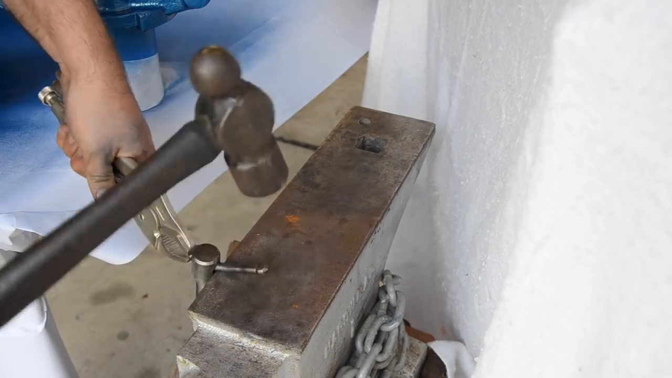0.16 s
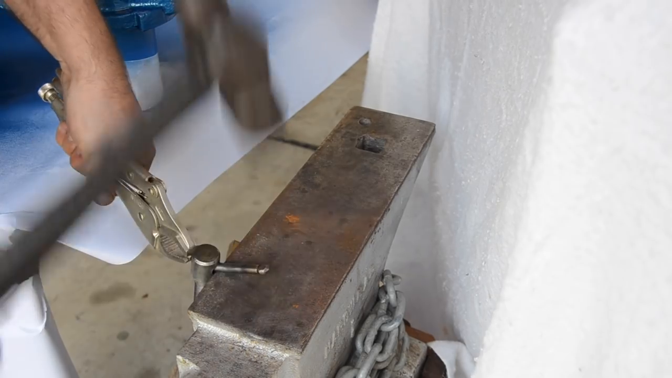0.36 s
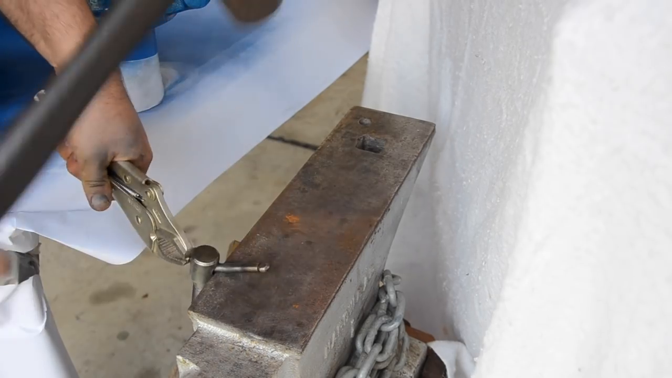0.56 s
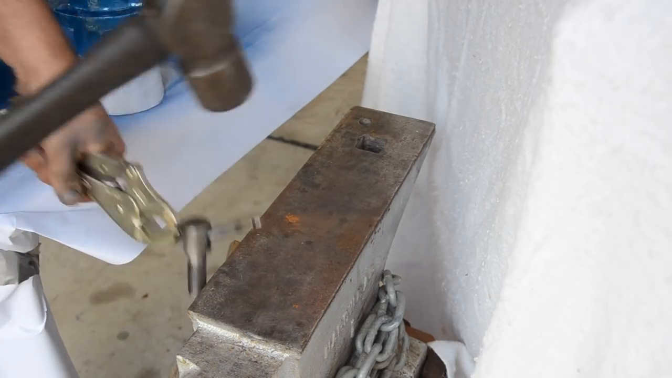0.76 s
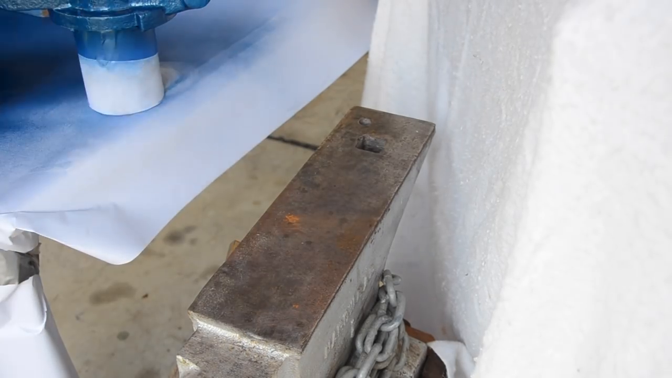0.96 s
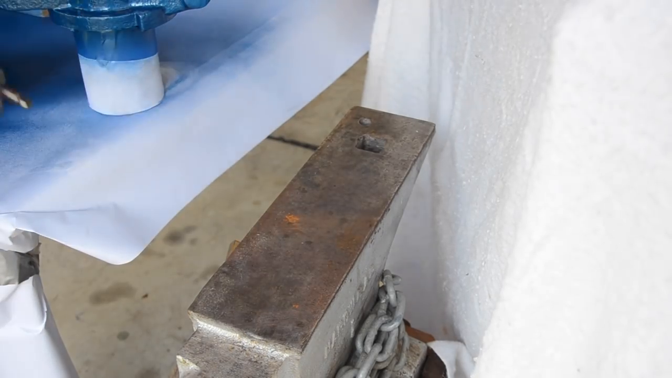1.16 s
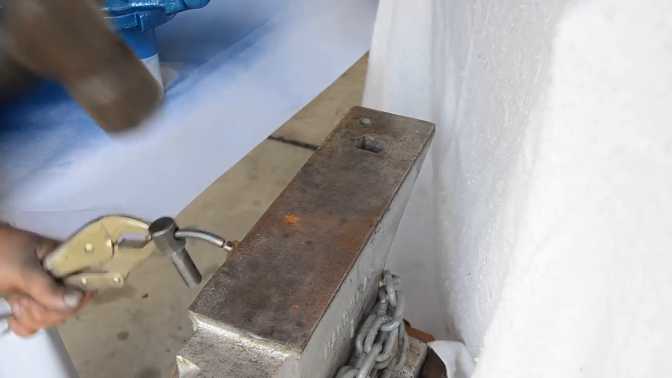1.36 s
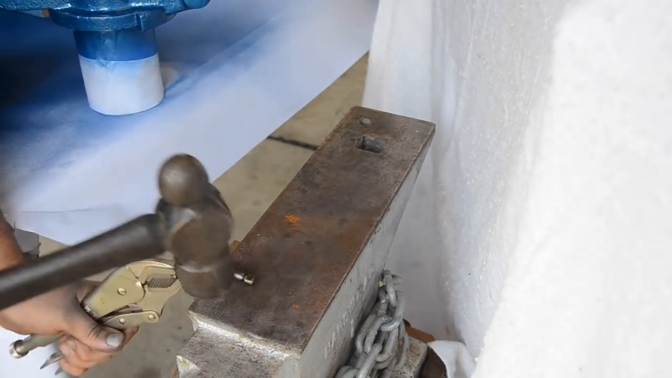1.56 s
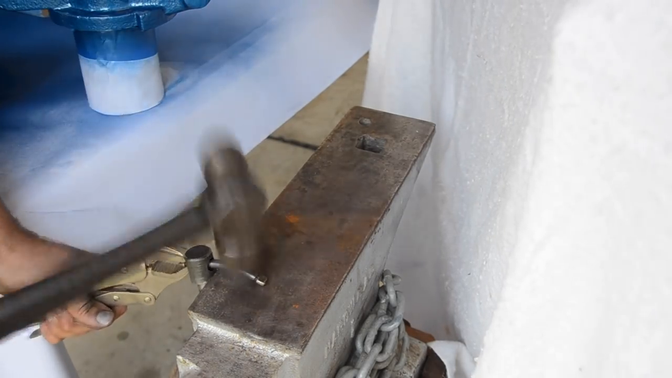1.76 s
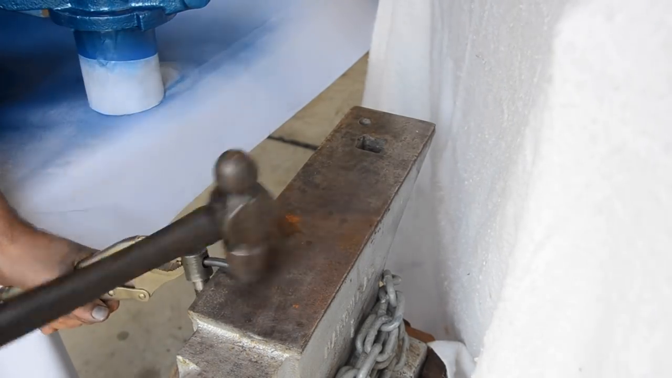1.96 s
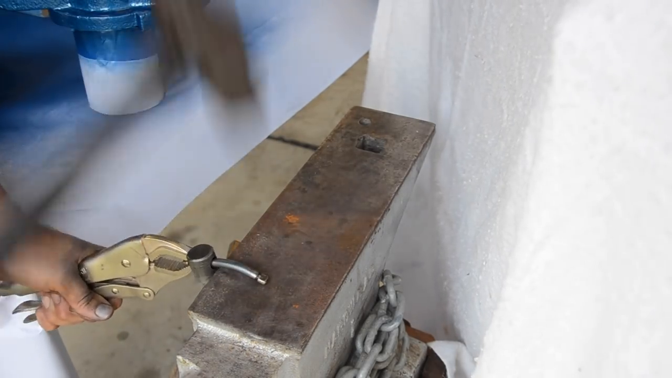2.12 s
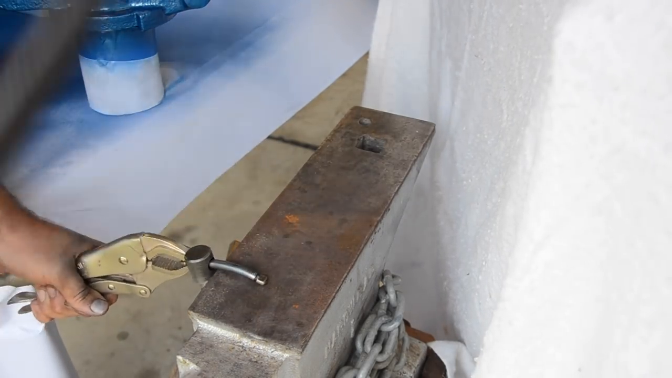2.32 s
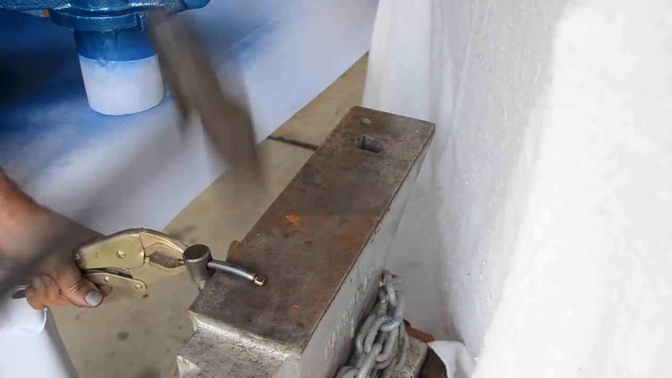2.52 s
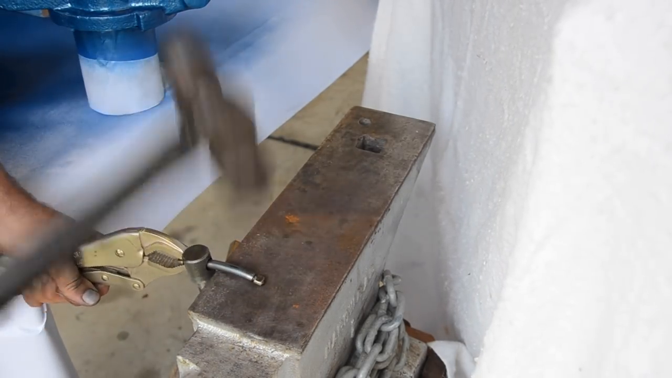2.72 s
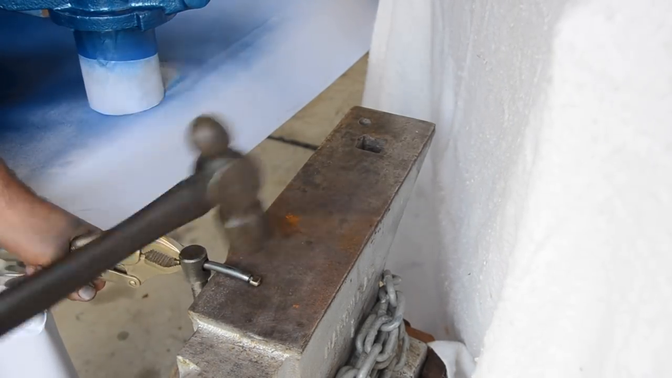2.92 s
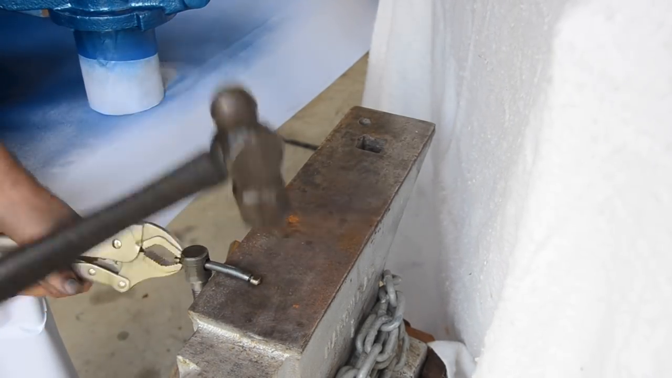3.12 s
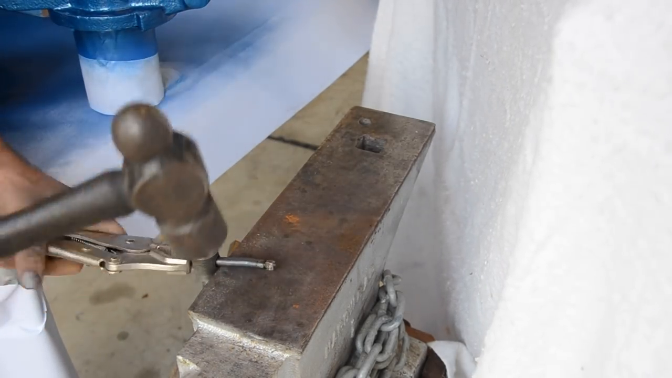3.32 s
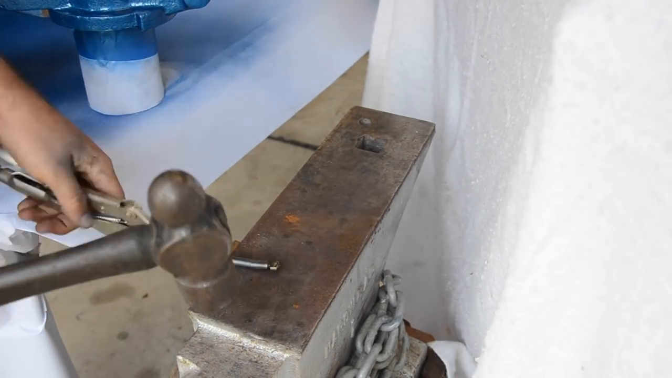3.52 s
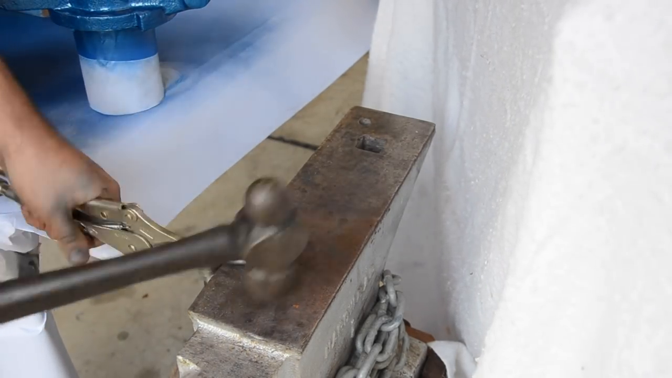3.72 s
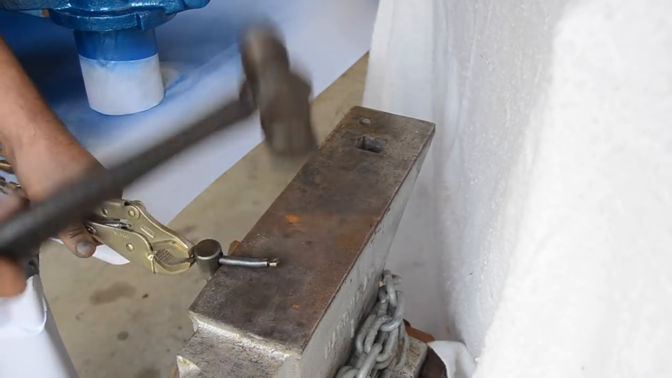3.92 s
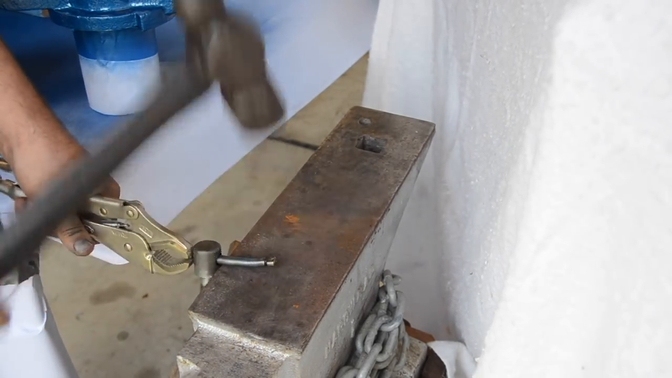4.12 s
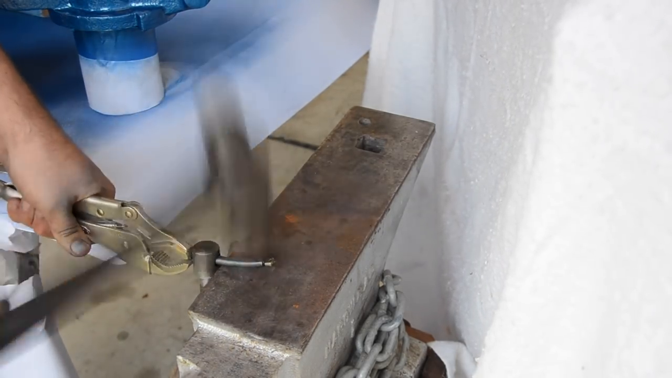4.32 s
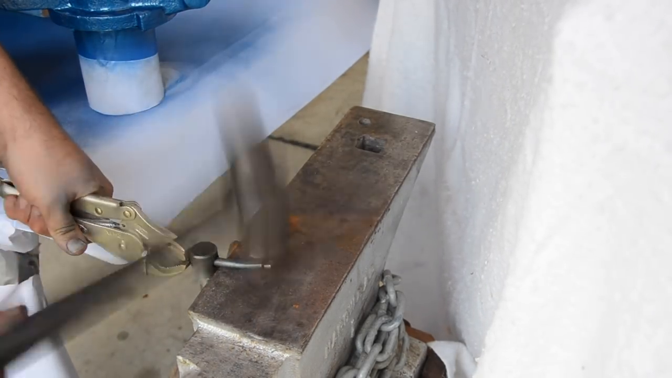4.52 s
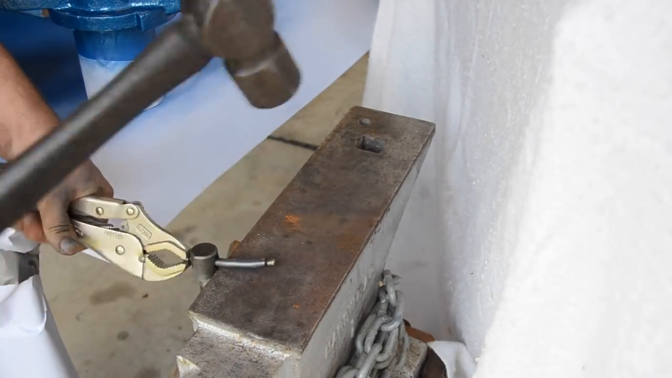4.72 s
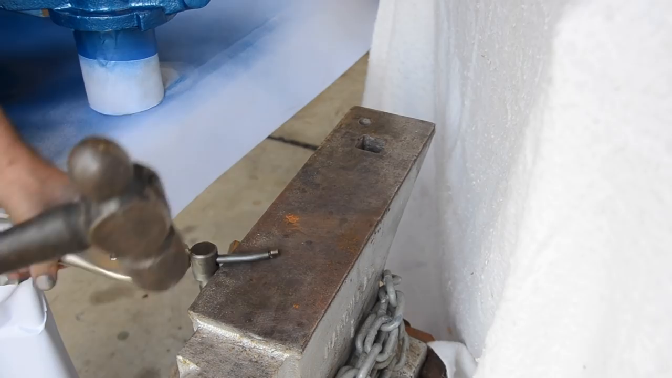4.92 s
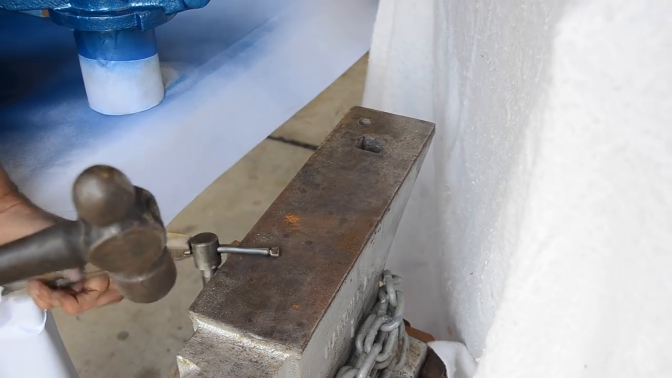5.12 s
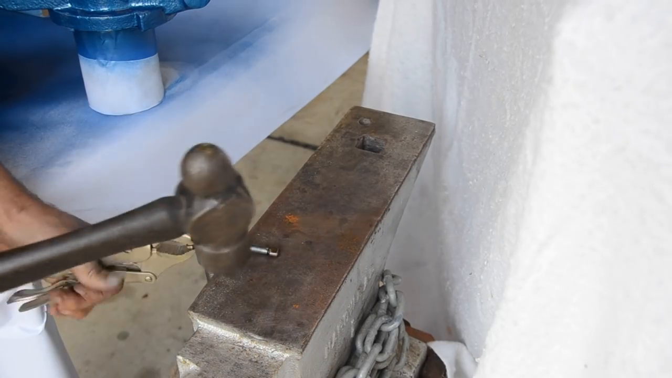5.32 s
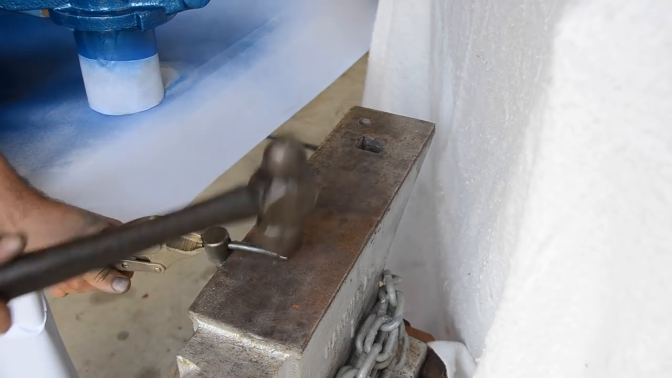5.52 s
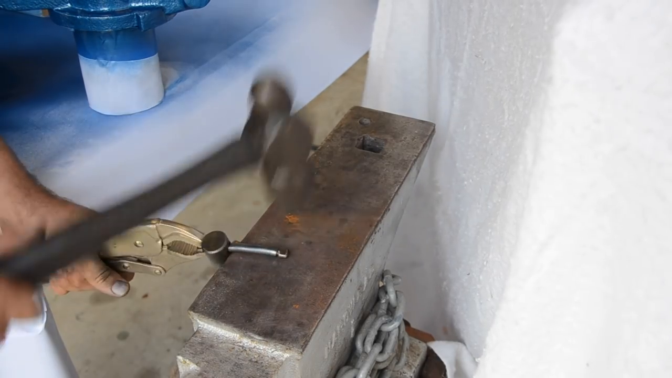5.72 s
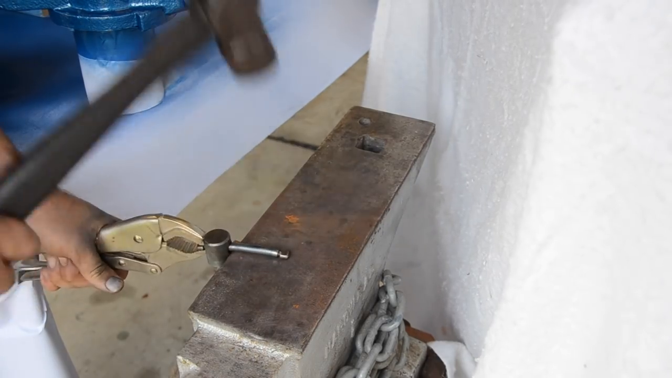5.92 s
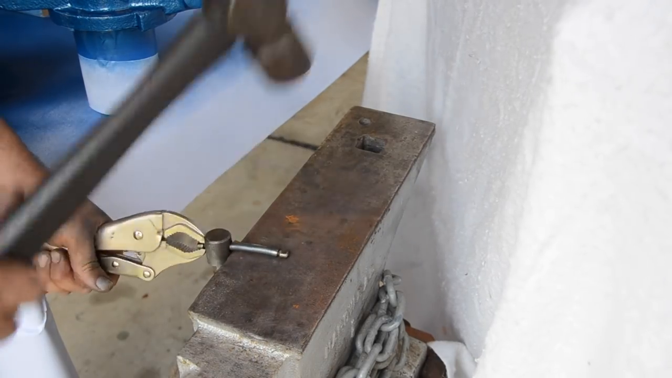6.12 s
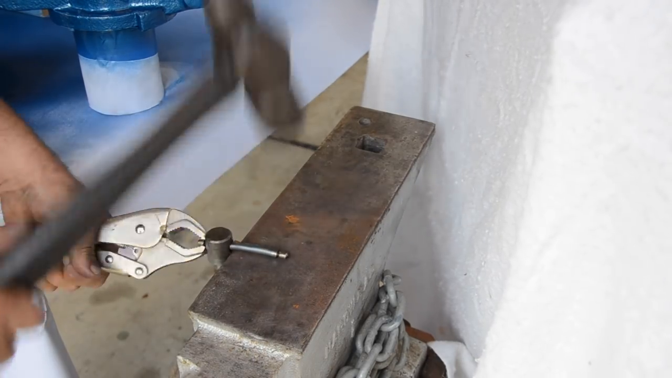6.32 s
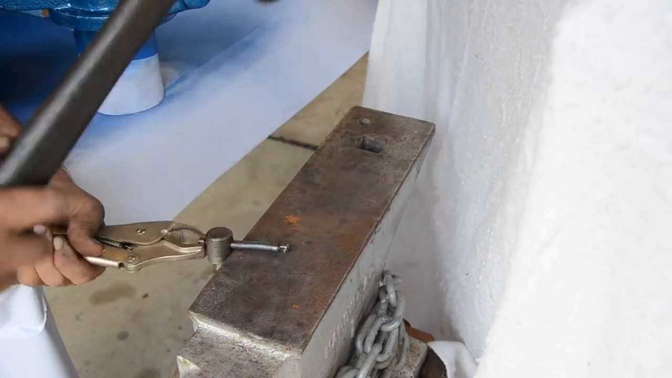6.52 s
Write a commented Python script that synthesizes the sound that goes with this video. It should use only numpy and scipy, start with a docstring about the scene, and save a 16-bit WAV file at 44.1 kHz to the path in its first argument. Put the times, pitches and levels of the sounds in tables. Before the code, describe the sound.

A hammer strikes a steel pin on an anvil in four runs of sharp, ringing blows, with plier clicks between and a faint bird late on.

```python
"""A ball-peen hammer forges a steel pin, held in locking pliers on an anvil in an open workshop.
From the first of four runs, each blow is a noise crack, a rattle, a thud and a set of dying steel tones.
In the pauses after it the pliers click, as noise ticks with ringing tones, and the pin scrapes as rough noise.
After the third run a distant bird, a gliding sine, begins to warble; it goes on into the fourth run.
Throughout lie low noise for the air, a thin sine whine and a faint noise hiss that swells and fades."""
import sys
import numpy as np
from scipy import signal
from scipy.fft import rfft, irfft
from scipy.io import wavfile

SR = 44100
rng = np.random.default_rng(int(sys.argv[2]) if len(sys.argv) > 2 else 0)


def wav_out(sig):
    """Save sig, one row per channel (or a flat mono array), as 16-bit PCM at SR to the path in sys.argv[1]."""
    wavfile.write(sys.argv[1], SR, np.round(np.clip(np.atleast_2d(sig).T, -1, 1) * 32767).astype(np.int16))


N = 294147

SIZE = 24576   # samples in one short sound
LEAD_S = .02   # room left before the contact
AGE = np.arange(SIZE) / SR - LEAD_S   # seconds since a contact
HZ = np.maximum(np.arange(SIZE // 2 + 1) * SR / SIZE, 1)
TIME = np.arange(N) / SR


# Hammer blows; the functions below add small fixed trims to the levels:
# (time [s], crack level [dB], clank level [dB], thud level [dB], gap under the pin [0-1], crack pitch [Hz],
#  clank pitch [Hz], thud pitch [Hz], main ring level [dB], strongest overtone [Hz], overtone level [dB])
HAMMER_BLOWS = [(0.2776, -12, -32, -39.5, 0.53, 8400, 1890, 410, -61, 5930, -52),
                (0.4694, -11, -28, -33, 0.6, 6900, 1983, 280, -46.5, 5930, -52),
                (0.657, -19, -26.5, -31.5, 0.92, 9500, 2240, 282, -54, 9085, -48),
                (1.8221, -9.5, -36.5, -36.5, 0.3, 9600, 1830, 417, -62.5, 4575, -63),
                (2.0078, -7, -26.5, -32.5, 0.44, 7200, 1830, 362, -45.5, 7220, -49),
                (2.2172, -25, -34.5, -25.5, 0.93, 8300, 2300, 320, -42.5, 9085, -36.5),
                (2.439, -6, -24.5, -27.5, 0.4, 7800, 1970, 304, -37.5, 9085, -36),
                (2.6248, -6.5, -25.5, -28.5, 0.24, 7900, 1955, 442, -36, 2466, -36),
                (2.7971, -8.5, -25, -31, 0.83, 8250, 1945, 342, -34.5, 11900, -39),
                (2.962, -11, -24, -27.5, 0.8, 8040, 1870, 333, -41, 11000, -52),
                (3.122, -5, -24, -25.5, 0, 8200, 2370, 320, -29, 2466, -31),
                (3.9251, -10, -34.5, -29.5, 0.27, 6130, 2090, 310, -55, 9085, -48.5),
                (4.0803, -6, -30.5, -30, 0.1, 6530, 2440, 260, -36.5, 9085, -41.5),
                (4.2171, -15.5, -25.5, -25.5, 0, 7100, 2240, 460, -42, 11000, -40.5),
                (4.4118, -15, -27, -26.5, 0.96, 9600, 2320, 260, -28.5, 11000, -43.5),
                (4.6174, -9, -26, -28.5, .45, 9200, 2260, 429, -38, 4575, -37),
                (5.582, -30, -49.5, -53, 0.86, 6300, 2070, 259, -53.5, 2466, -52.5),
                (5.751, -20.5, -27, -29.5, 0.83, 6300, 1990, 325, -37.5, 11000, -51),
                (5.9162, -10.5, -27.5, -24, .48, 7300, 1790, 320, -39, 14300, -49),
                (6.0709, -9, -24, -27, 0.44, 6800, 1954, 315, -42, 2466, -36),
                (6.243, -11.5, -27.5, -23.5, 0.66, 8000, 2220, 362, -25, 11000, -44.5),
                (6.4362, -9.5, -28.5, -24, 0, 8160, 1415, 324, -38.5, 11000, -35)]
# How the pin lies after it is turned or laid down afresh:
# (start time [s], hollowness [dB], favoured mode [Hz], damped mode [Hz], jangle level change [dB])
PIN_GRIPS = [(0, -6.5, 11000, 4575, -1), (1.7, -1, 9085, 5930, -1), (2.9, -2, 11900, 5930, -4.5),
             (3.8, -4, 4575, 14300, -.5), (5.5, 8, 14300, 9085, -4.5)]
KNOCK_DB, KNOCK_PER_HOLLOW = -6, 1   # knock against the crack; a hollow seat knocks more
JANGLE_DB_PER_GAP = -1.5   # a pin that lies flat jangles most
TOUCH_DB, TOUCH_DB_PER_GAP = -28.5, 34.5   # first touch against the thud: faint when the pin lies flat
RATTLE_S, WIDE_GAP_RATTLE_S, RATTLE_POWER = 0.011, 0.022, 5   # only a wide gap makes the pin chatter for long


def hammer():
    """Each grip colours several blows; a pin that stands proud is touched early and rattles long."""
    out = np.zeros(N)
    steel_db = ripple(width_hz=110, depth_db=2)   # the same steel in all blows
    for (s, crack_db, clank_db, thud_db, gap, crack_hz, clank_hz, thud_hz,
         ring_db, overtone_hz, overtone_db) in HAMMER_BLOWS:
        latest_grip = [grip for grip in PIN_GRIPS if grip[0] <= s][-1]
        _, hollow_db, favoured_hz, damped_hz, loose_db = latest_grip
        knock_db = crack_db + KNOCK_DB + KNOCK_PER_HOLLOW * hollow_db
        jangle_db = (clank_db + thud_db) / 2 + loose_db + JANGLE_DB_PER_GAP * (gap - .5)
        touch_db = thud_db + TOUCH_DB + TOUCH_DB_PER_GAP * gap
        rattle_s = RATTLE_S + WIDE_GAP_RATTLE_S * np.clip(gap, 0, 1) ** RATTLE_POWER
        body_colour_db = hump(clank_hz, octaves=.08, height_db=10.0)
        body_colour_db += hump(1300, octaves=1.0, height_db=hollow_db)
        body_colour_db += hump(760, octaves=.4, height_db=2.0)
        family_db = ring_levels(ring_db, thud_db, favoured_hz, damped_hz, overtone_hz, overtone_db)
        add(out, impact(crack_db, knock_db, touch_db, body_colour_db, crack_hz), s)
        add(out, rattle(jangle_db, clank_db, rattle_s, body_colour_db, steel_db), s)
        add(out, stand(thud_db, thud_hz, rattle_s), s)
        add(out, ringing(family_db), s)
    return out


# Colour of the sharp crack: (frequency [Hz], level per Hz [dB])
CRACK_COLOUR = [(2200, 4.5), (3000, -5.5), (4200, -4.5), (5100, -1), (5680, -19), (6250, -1.5),
                (6920, -11.5), (7600, -4), (8300, -2.5), (9000, -6), (10300, -6.5), (11500, -12),
                (15000, -15.5), (16500, -49)]
# Colour of the duller knock: (frequency [Hz], level per Hz [dB])
KNOCK_COLOUR = [(100, -20), (350, 3), (520, -6), (1100, -8), (1500, -5), (2000, -2), (2400, -6),
                (3000, -11.5), (4000, -20.5)]


def impact(crack_db, knock_db, touch_db, body_colour_db, crack_hz):
    """The face meets the pin, presses it down and bottoms out in a crack a few milliseconds long."""
    crack_peak_db = hump(crack_hz, octaves=0.22, height_db=10.0)
    crack = dense_modes(CRACK_COLOUR, crack_peak_db) * envelope(0.00078, 0.0019, 0.012)
    knock = dense_modes(KNOCK_COLOUR, body_colour_db) * envelope(0.00026, 0.00094, 0.016)
    touch = dense_modes(KNOCK_COLOUR) + 1.2 * dense_modes(CRACK_COLOUR)
    touch *= from_db(np.minimum(AGE, 0) * 4100) * (AGE < 0)   # swells up to the main contact
    return (at_level(crack, crack_db + 1.5, 0, 0.0023)
            + at_level(knock, knock_db + 0.23, 0, 0.0027)
            + at_level(touch, touch_db, -0.0039, -0.0004))


# Colour of the bright jangle: (frequency [Hz], level per Hz [dB])
JANGLE_COLOUR = [(2000, -22.5), (2700, -2.5), (3700, -0.5), (4500, 2), (5200, 3.5), (5680, -11.5),
                 (6250, 2.5), (6920, -1.5), (7600, 3.5), (8600, -3.5), (10200, -3.5), (12000, -7),
                 (14500, -33.5), (16000, -35.5)]
# Colour of the lower clank: (frequency [Hz], level per Hz [dB])
CLANK_COLOUR = [(500, -52.5), (800, -18.5), (1150, -12.5), (1500, -7.5), (2000, 3.5), (2400, -9),
                (2700, -4), (3500, -20.5)]


def rattle(jangle_db, clank_db, rattle_s, body_colour_db, steel_db):
    """Pin and pliers chatter on the anvil, longer when the pin did not lie flat."""
    chatter = from_db(1.3 * drift(420))
    modes_db = steel_db + ripple(width_hz=85, depth_db=3.6)
    partials_db = ripple(width_hz=45, depth_db=3.5)
    jangle = dense_modes(JANGLE_COLOUR, modes_db) * envelope(0.0035, rattle_s, 0.16) * chatter
    clank = dense_modes(CLANK_COLOUR, body_colour_db + partials_db)
    clank *= envelope(0.0044, rattle_s, 0.15) * chatter
    return at_level(jangle, jangle_db + .5, 0.0073, .05) + at_level(clank, clank_db + .6, 0.0078, 0.038)


# Colour of the thud in the stand: (frequency [Hz], level per Hz [dB])
THUD_COLOUR = [(30, -47), (60, -17.5), (110, -11.5), (170, -3.5), (210, -4), (260, -2), (330, 0.5),
               (440, -1.5), (510, -8.5), (570, -3), (690, -5), (820, -13), (1300, -17.5)]
# Colour of the workshop's answer: (frequency [Hz], level per Hz [dB])
ROOM_COLOUR = [(30, -30.5), (80, 7), (120, 2.5), (175, 7), (230, 2), (400, 2), (620, -2), (850, -12),
               (2200, -20.5), (3200, -25), (5000, -37), (8000, -40), (12000, -78), (16000, -56)]


def stand(thud_db, thud_hz, rattle_s):
    """The stand knocks under the anvil, one firm note among many heavy modes, and the workshop answers."""
    modes_db = ripple(width_hz=22, depth_db=3.0)
    thud_peak_db = hump(thud_hz, octaves=0.6, height_db=3.0)
    thud = dense_modes(THUD_COLOUR, modes_db + thud_peak_db) * envelope(0.00082, rattle_s, 0.26)
    note = np.sin(2 * np.pi * thud_hz * AGE) * envelope(0.0089, 0, 0.043)
    room = dense_modes(ROOM_COLOUR, modes_db) * envelope(0.034, 0.063, 0.74)
    return (at_level(thud, thud_db - 0.68, 0, 0.073)
            + at_level(note, thud_db - 8.5, 0, 0.063)
            + from_db(thud_db - 10.5) * room)


# Modes of the ringing steel, before each blow's own changes:
# (family [number], frequency [Hz], level in its family [dB], time to fall 60 dB [s])
STEEL_MODES = [(0, 2338, 0, .18), (0, 4038, -15, .15), (1, 2466, 0, .22), (1, 6250, -15, .15),
               (1, 7668, -10, .18), (2, 4575, 0, .17), (2, 5038, -4, .17), (2, 10395, -14, .16),
               (2, 7224, -11, .45), (3, 5932, 0, .38), (4, 9085, 0, .27), (4, 9937, -15, .14),
               (5, 11018, -2, .25), (5, 11613, -6, .45), (6, 11822, 0, .24), (6, 12381, -17, .26),
               (7, 13020, -14, .28), (7, 14225, -5, .27), (7, 14343, -3, .26), (7, 14545, -7, .24)]
RING_T60_SHARE, RING_DETUNE_HZ = 0.94, 5   # the pin loads the steel differently at every blow


def ringing(family_db):
    """The blow sets many modes ringing, the pin damps them and reflections make each one waver."""
    out = np.zeros(SIZE)
    for family, hz, db, t60 in STEEL_MODES:
        t60 = RING_T60_SHARE * t60 * rng.uniform(0.86, 1.11)
        bent_hz = hz + RING_DETUNE_HZ * rng.standard_normal()
        phase = 2 * np.pi * (bent_hz * AGE + rng.random())
        tone = (1 + .42 * drift(75)) * np.cos(phase + .42 * drift(75))
        dying = envelope(0.0076, 0, t60) / from_db(-60 * 0.044 / t60)   # gain is 1 at 44 ms
        mode_db = family_db[family] + db + 1.57 + 1.3 * rng.standard_normal()
        out += from_db(mode_db) * dying * tone
    return out


def family_near(hz):
    """The family of the steel mode closest to a pitch."""
    return min(STEEL_MODES, key=lambda mode: abs(mode[1] - hz))[0]


# Starting level of each family of steel modes against the main ring: (level [dB])
FAMILY_LEVELS = [0.5, -8.5, -16.5, -24.5, -12.5, -14, -23.5, -22]
FAVOURED_DB, DAMPED_DB = 6, -5
OVERTONE_DB, OVERTONES_FOLLOW_THUD = -12.5, 0.55   # upper families partly follow the blow's weight


def ring_levels(ring_db, thud_db, favoured_hz, damped_hz, overtone_hz, overtone_db):
    """The grip favours one family of modes and damps another; the landing spot brings out one overtone."""
    levels_db = np.array(FAMILY_LEVELS, float) + ring_db
    levels_db[1:] += OVERTONES_FOLLOW_THUD * (thud_db + OVERTONE_DB - ring_db)
    levels_db[family_near(favoured_hz)] += FAVOURED_DB
    levels_db[family_near(damped_hz)] += DAMPED_DB
    levels_db[family_near(overtone_hz)] = overtone_db
    return levels_db


# Pliers touching pin and anvil, before the 12.5 dB cut below and the 14 dB treble lift in jaw_touch:
# (time [s], level [dB], treble [dB])
PLIER_CLICKS = [(0.8287, -29.5, -22), (1.0518, -32.5, -21.5), (1.078, -22.5, -22), (1.1172, -25, -24),
                (1.1501, -23, -18), (1.1711, -17.5, -9), (1.283, -22.5, 3), (1.3325, -30, -2),
                (1.5353, -32, -41), (1.5746, -33, -23), (3.3812, -35, -29), (3.607, -35.5, -6.5),
                (3.7405, -31.5, -28.5), (4.8258, -32, -19.5), (5.0685, -24, -20.5), (5.6863, -37, -44),
                (1.1805, -33, -8), (6.5988, -33.5, 3)]


def pliers():
    """The pliers touch pin and anvil in light clinks with a short ring."""
    out = np.zeros(N)
    for s, db, treble_db in PLIER_CLICKS:
        add(out, from_db(db - 12.5) * jaw_touch(treble_db), s)
    return out


# The pin dragged over the anvil: (time [s], length [s], level [dB])
PIN_DRAGS = [(1.128, 0.037, -39), (1.34, 0.015, -38), (4.938, 0.063, -57), (5.024, 0.023, -54),
             (5.145, 0.074, -61.5)]
DRAG_RISE_S, DRAG_T60_S = 0.026, .09
DRAG_ECHO_DB, DRAG_ECHO_T60_S = -8.5, 0.39
TICKS_PER_DRAG, TICK_WINDOW_S, TICK_DB = 3, 0.14, -10.5   # small slips as the pin settles


def pin_scrapes():
    """The pin drags grittily over the anvil as it is turned, with small ticks as it settles."""
    out = np.zeros(N)
    for s, length_s, db in PIN_DRAGS:
        grit = dense_modes(PLIERS_COLOUR, ripple(width_hz=130, depth_db=5))
        grit = rms_one(grit * from_db(3.6 * drift(500)))
        stroke = envelope(DRAG_RISE_S, length_s, DRAG_T60_S)
        stroke += from_db(DRAG_ECHO_DB) * envelope(DRAG_RISE_S, length_s, DRAG_ECHO_T60_S)
        add(out, from_db(db) * grit * stroke, s)
        for delay_s in TICK_WINDOW_S * rng.random(size=TICKS_PER_DRAG):
            add(out, from_db(db + TICK_DB) * jaw_touch(treble_db=-8), s + delay_s)
    return out


# Colour of pliers and pin rubbing or touching: (frequency [Hz], level per Hz [dB])
PLIERS_COLOUR = [(700, -20), (1250, -2.5), (1600, -4), (2100, 4), (3000, 0.5), (4800, -1), (5700, -13),
                 (6500, -2.5), (7700, -11.5), (9000, -9.5), (12000, -20), (16000, -38)]
CLINK_HZ, CLINK_DB = 2160, -5.5


def jaw_touch(treble_db):
    """One light contact: a tick, a little room and the ring of the jaws."""
    modes_db = ripple(width_hz=210, depth_db=5.5)
    colour_db = hump(7400, octaves=1.0, height_db=treble_db + 14)
    colour_db += hump(CLINK_HZ, octaves=0.052, height_db=8)
    tick = envelope(.0003, .001, .02)
    room = 0.17 * envelope(0.0055, 0, 0.13)
    contact = dense_modes(PLIERS_COLOUR, modes_db + colour_db) * (tick + room)
    return contact + from_db(CLINK_DB) * clink(colour_db)


# Ringing modes of the jaws, before each touch's colour and chance: (frequency [Hz], level [dB])
JAW_RING = [(1310, 6), (1900, 10), (2290, 6), (3120, 0), (4050, 6), (4450, -12), (5050, 6.5), (6500, -19),
            (7680, 4), (8500, -19), (11200, -15)]


def clink(colour_db):
    """The jaws ring briefly, each mode with a strength of its own at every touch."""
    tones = np.zeros(SIZE)
    for hz, db in JAW_RING:
        mode_db = db + np.interp(hz, HZ, colour_db) + 2 * rng.standard_normal()
        tones += from_db(mode_db) * np.sin(2 * np.pi * (hz * AGE + rng.random()))
    return rms_one(tones) * envelope(0.00087, 0, 0.073)


# Bird syllables: (time of the dip [s], pitch at the dip [Hz], level [dB])
BIRD_SYLLABLES = [(4.809, 2710, -50.5), (4.929, 2670, -48), (5.05, 2490, -52.5), (5.154, 2467, -45.5),
                  (5.273, 2467, -44.5), (5.389, 2443, -41), (5.826, 2450, -43.5), (6.059, 2400, -40.5)]
# Shape of one syllable: (time from the dip [s], pitch above the dip [Hz], level [dB])
SYLLABLE_SHAPE = [(-.052, 210, -32), (-.03, 100, -6), (-.012, 15, -2), (.004, 0, 0), (.024, 90, -1),
                  (.042, 240, -6), (.06, 290, -35)]


def bird():
    """A nearly pure whistle that dips and rises in every syllable, with a few echoes from the yard."""
    out = np.zeros(N)
    age, above_hz, shape_db = np.transpose(SYLLABLE_SHAPE)
    from_dip = AGE + age[0]
    for s, hz, db in BIRD_SYLLABLES:
        pitch = hz + np.interp(from_dip, age, above_hz) + 22 * drift(207)
        swell_db = np.interp(from_dip, age, shape_db, left=-120, right=-120)
        loud = from_db(db + swell_db + 2.0 * drift(122))
        add(out, loud * np.sin(2 * np.pi * np.cumsum(pitch) / SR), s + age[0])
    lags = rng.uniform(.005, .06, size=8)   # seconds
    echoes = sum(np.interp(TIME - lag, TIME, out) * from_db(-60 * lag / 0.28) for lag in lags)
    return out + from_db(-9) * echoes


# Level of the faint hiss over time: (time [s], level [dB])
HISS_LEVEL = [(0, -75), (.6, -76.5), (.85, -57), (1.02, -70), (1.4, -64), (1.8, -73), (2.6, -83.5),
              (3.33, -59.5), (3.6, -62), (3.8, -84.5), (4.7, -74), (5.0, -62.5), (5.12, -73), (5.38, -63),
              (5.56, -67), (5.65, -82), (6.67, -68.5)]
# Colour of the hiss: (frequency [Hz], level per Hz [dB])
HISS_COLOUR = [(1500, -13.5), (3000, -1), (4800, 8.5), (5700, -4), (8000, 4.5), (11000, -1), (13000, -12),
               (16000, -29.5)]


def faint_hiss():
    """Noise that swells and fades; a copy at a wandering short delay makes its colour sweep slowly."""
    level = from_db(np.interp(TIME, *np.transpose(HISS_LEVEL)))
    hiss = level * from_db(1.5 * drift(85, size=N)) * dense_modes(HISS_COLOUR, size=N)
    delay_s = .0006 + .00007 * drift(9, size=N)
    moving_echo = .35 * np.interp(TIME - delay_s, TIME, hiss)
    return hiss + moving_echo


# Colour of the workshop air: (frequency [Hz], level per Hz [dB])
AIR_COLOUR = [(15, -72.5), (25, -25.5), (90, -10.5), (128, -1.5), (172, -11.5), (335, -13), (394, -4.5),
              (427, -10.5), (691, -16), (903, -17.5), (1150, -20), (1390, -18.5), (5720, -30),
              (11800, -47.5), (15000, -65.5)]
AIR_DB = -57.5


def workshop_air():
    """Low steady noise of the workshop air."""
    return from_db(AIR_DB) * dense_modes(AIR_COLOUR, size=N)


WHINE_HZ, WHINE_DB = 15735, -68.5


def electrical_whine():
    """A thin, steady electrical whine: one very high sine."""
    return from_db(WHINE_DB) * np.sin(2 * np.pi * WHINE_HZ * TIME)


def from_db(db):
    """Decibels to gain."""
    return 10 ** (np.asarray(db) / 20)


def rms_one(x):
    """Scale to an rms (average strength) of 1."""
    return x / np.sqrt(np.mean(x ** 2) + 1e-20)


def at_level(sound, db, start, end):
    """Scale a sound to a given rms level between two ages in seconds."""
    part = sound[(AGE >= start) & (AGE < end)]
    return sound * from_db(db) / np.sqrt(np.mean(part ** 2) + 1e-20)


def add(out, sound, s):
    """Mix in a sound whose contact falls at s seconds."""
    start = round((s - LEAD_S) * SR)
    out[start:start + SIZE] += sound[:N - start]


def envelope(rise, hold, t60):
    """Rises from the contact, begins to die after the hold and then falls 60 dB in t60 seconds."""
    attack = np.clip(AGE / max(rise, 1e-5), 0, 1)
    return attack * from_db(-60 * np.clip((AGE - hold) / t60, 0, 4))


def dense_modes(spectrum, extra_db=0, size=SIZE):
    """Countless overlapping modes, made as noise shaped by one spectrum; rms 1."""
    hz, db = np.transpose(spectrum)
    bins = np.maximum(np.arange(size // 2 + 1) * SR / size, 1)
    shape = np.interp(np.log(bins), np.log(hz), db)
    decades_above = np.maximum(np.log10(bins / hz[-1]), 0)
    decades_below = np.maximum(np.log10(hz[0] / bins), 0)
    shape -= 40 * (decades_above + decades_below)   # fade beyond both ends of the table
    return rms_one(irfft(rfft(rng.standard_normal(size)) * from_db(shape + extra_db), size))


def hump(hz, octaves, height_db):
    """A resonance around one pitch, in dB."""
    return height_db / (1 + (np.log2(HZ / hz) / octaves) ** 2)


def ripple(width_hz, depth_db):
    """Uneven peaks and dips of a steel part or the stand, in dB."""
    knots = rng.standard_normal(4096)
    return depth_db * np.interp(HZ / width_hz, np.arange(len(knots)), knots)


def drift(rate, size=SIZE):
    """Random values, rate of them per second, joined by straight lines; spread near 1."""
    knots = rng.standard_normal(1024)
    return np.interp(np.arange(size) / SR * rate, np.arange(len(knots)), knots)


def scene():
    """Everything heard from one spot above the anvil."""
    work = hammer() + pliers() + pin_scrapes()
    background = faint_hiss() + workshop_air() + electrical_whine()
    return (work + bird() + background)[None]


CUTOFF_HZ = 16200


def record(dry):
    """The cracks overload the microphone softly; the top is cut."""
    rounded = dry / (1 + dry ** 4) ** (1 / 4)
    return signal.sosfilt(signal.ellip(8, .1, 70, CUTOFF_HZ, fs=SR, output="sos"), rounded)


dry = scene()
out = record(dry)
wav_out(out)
```